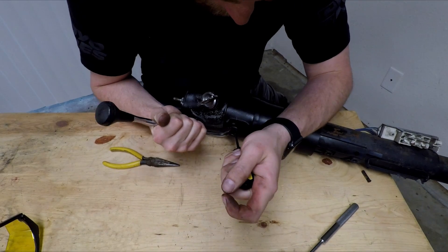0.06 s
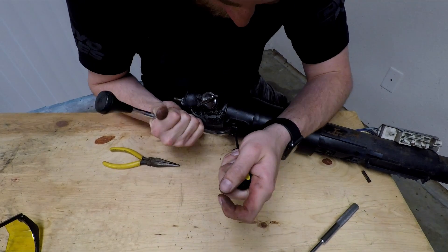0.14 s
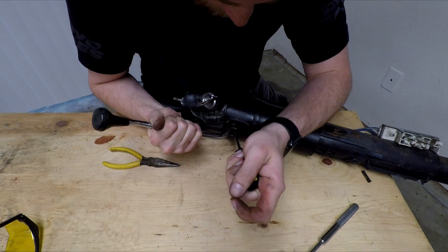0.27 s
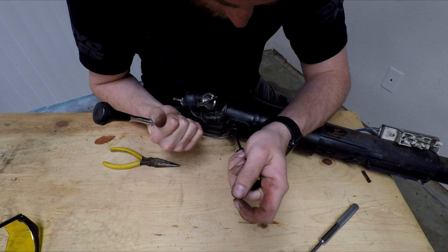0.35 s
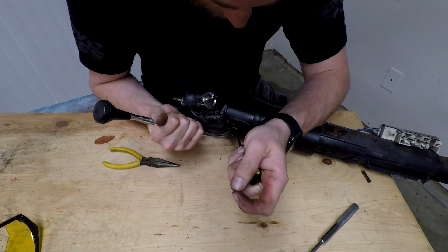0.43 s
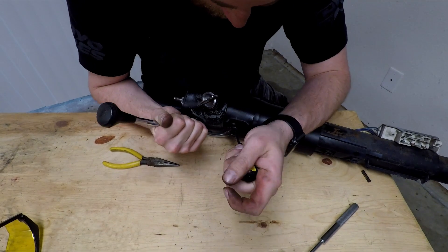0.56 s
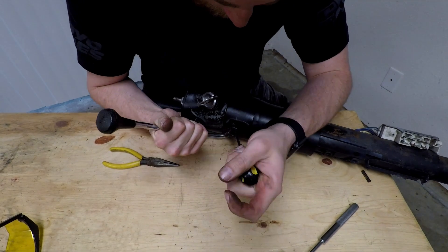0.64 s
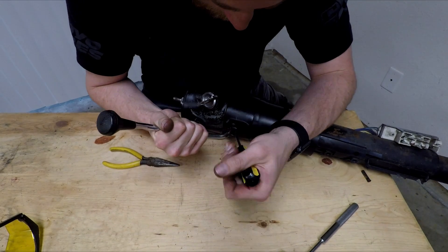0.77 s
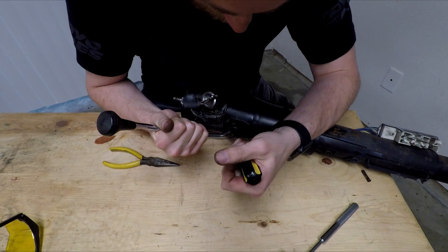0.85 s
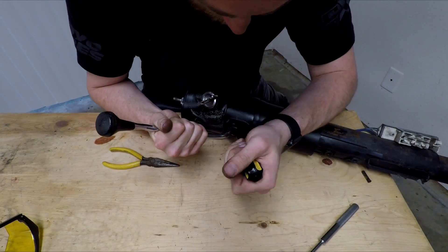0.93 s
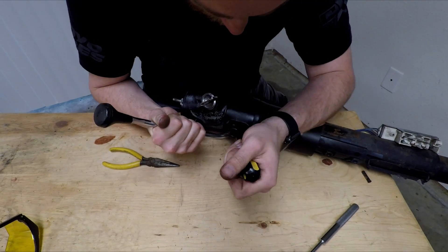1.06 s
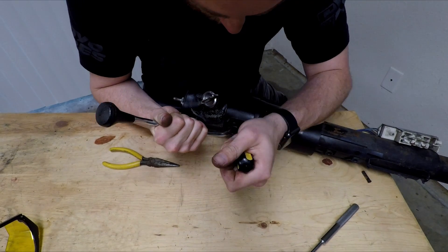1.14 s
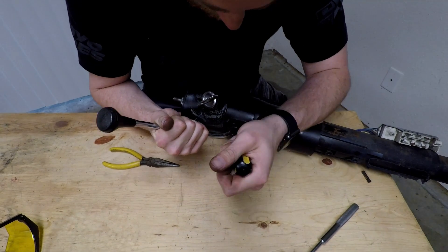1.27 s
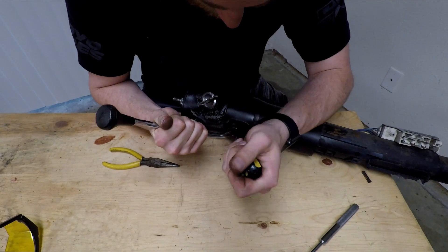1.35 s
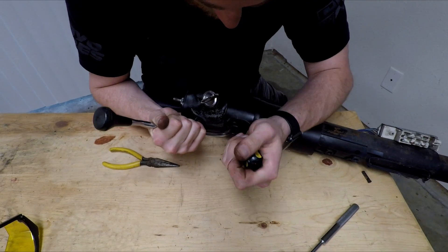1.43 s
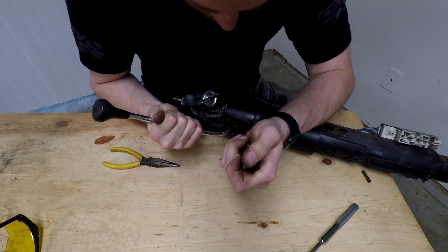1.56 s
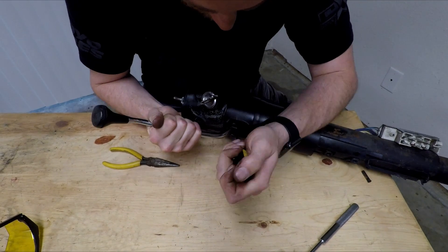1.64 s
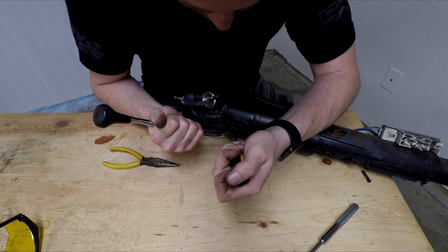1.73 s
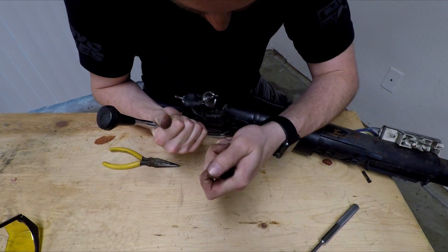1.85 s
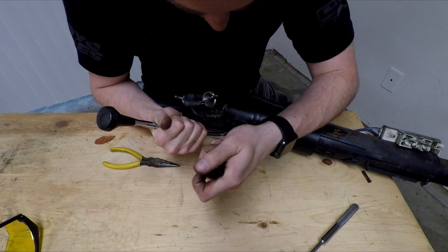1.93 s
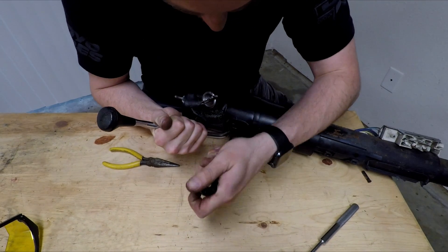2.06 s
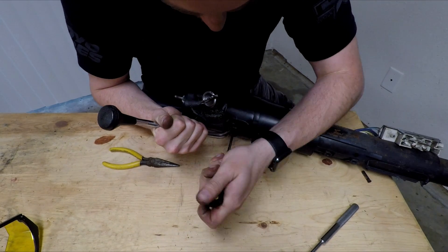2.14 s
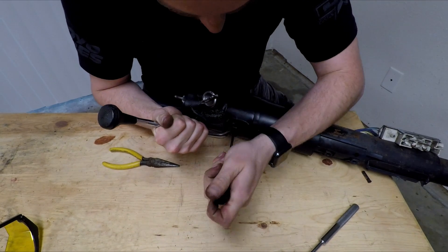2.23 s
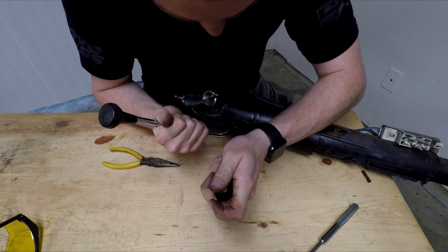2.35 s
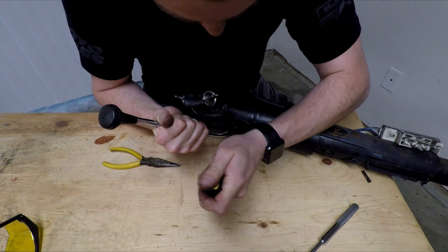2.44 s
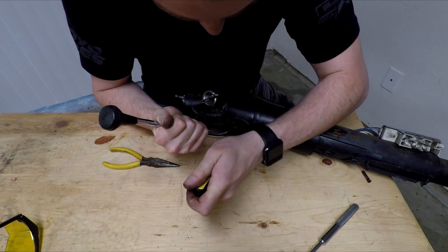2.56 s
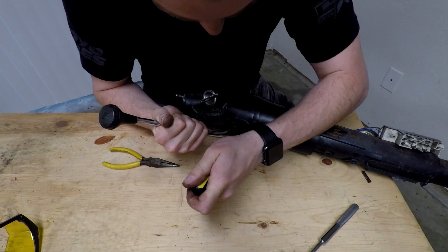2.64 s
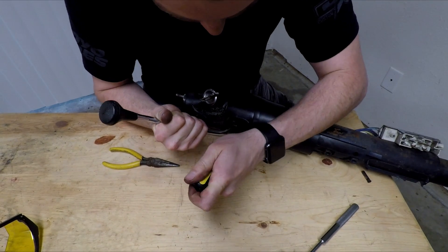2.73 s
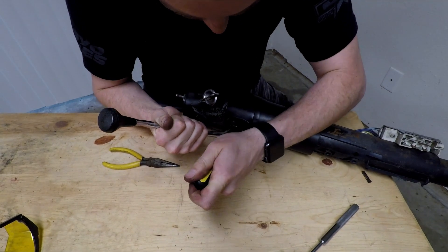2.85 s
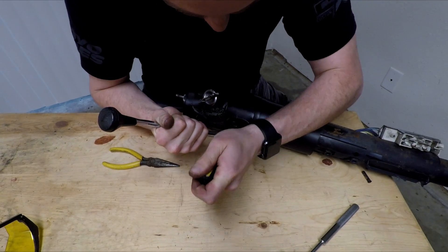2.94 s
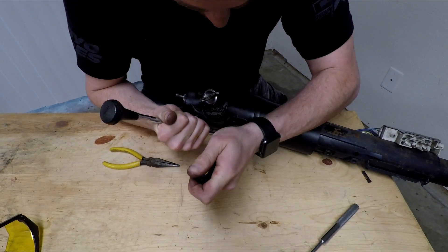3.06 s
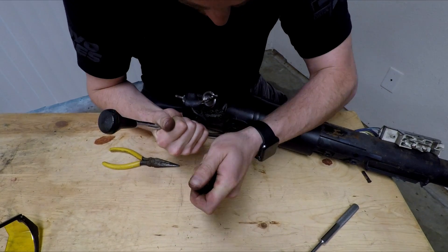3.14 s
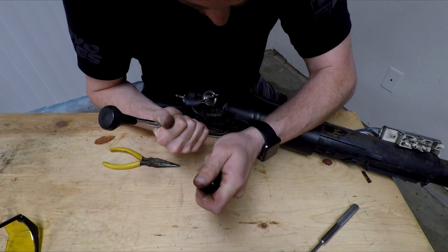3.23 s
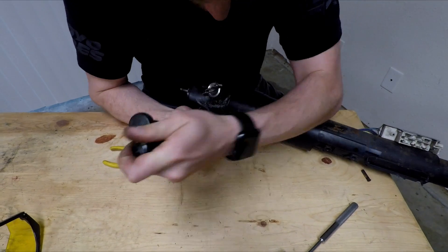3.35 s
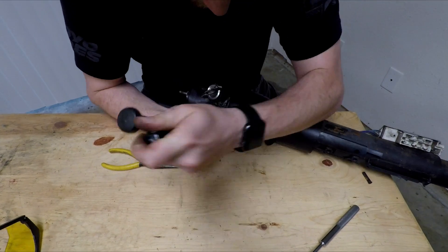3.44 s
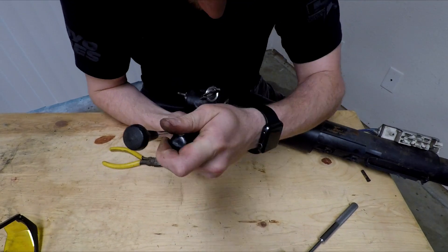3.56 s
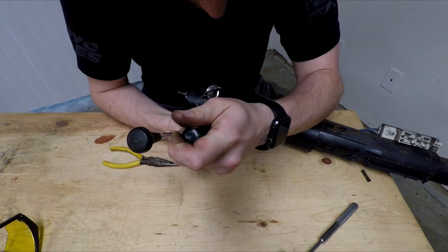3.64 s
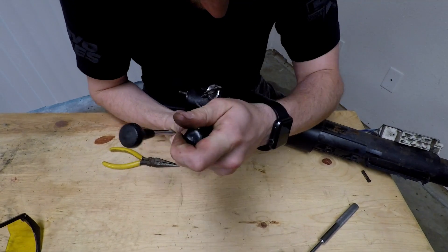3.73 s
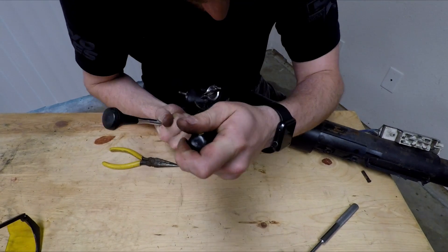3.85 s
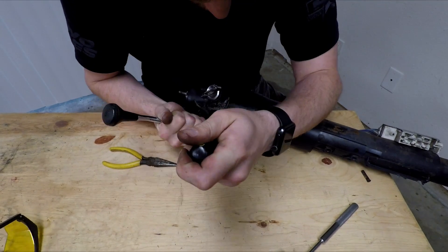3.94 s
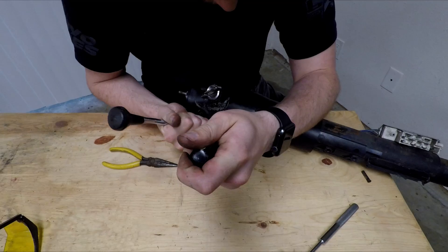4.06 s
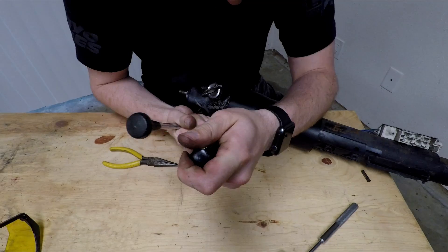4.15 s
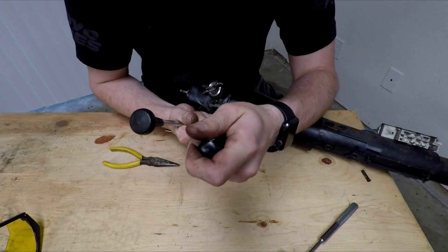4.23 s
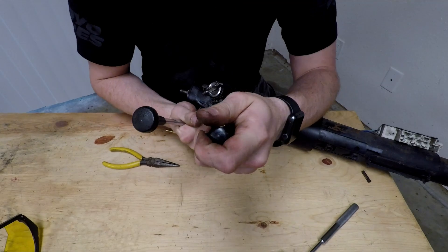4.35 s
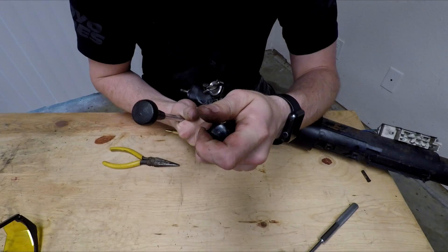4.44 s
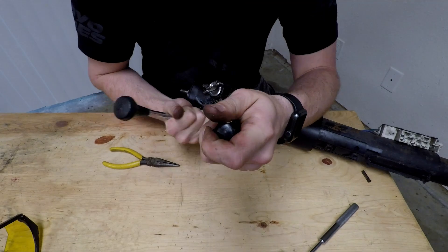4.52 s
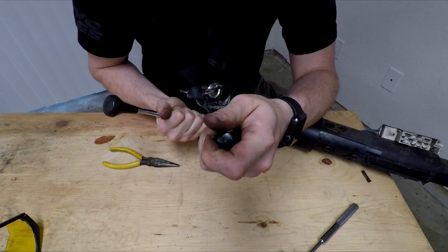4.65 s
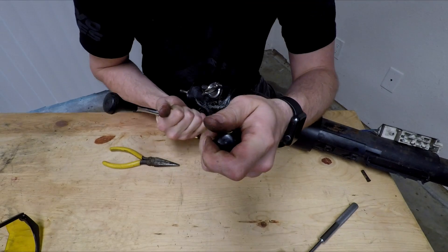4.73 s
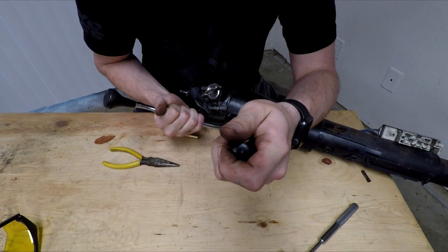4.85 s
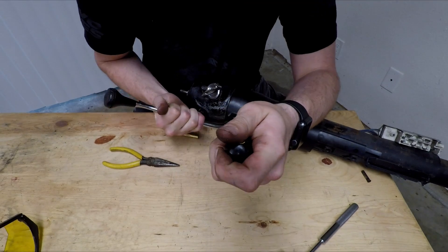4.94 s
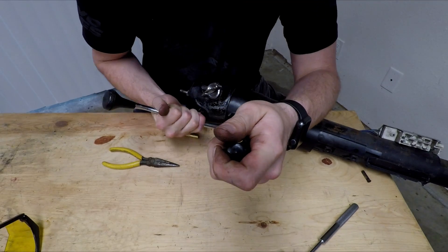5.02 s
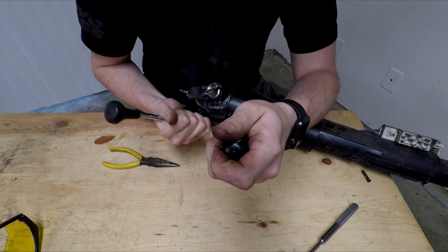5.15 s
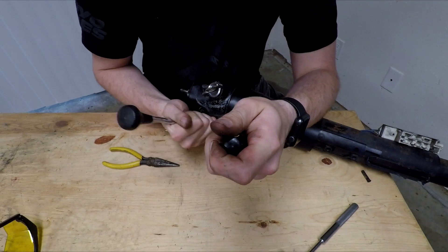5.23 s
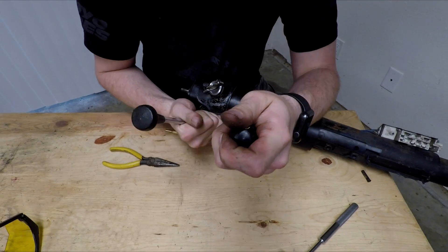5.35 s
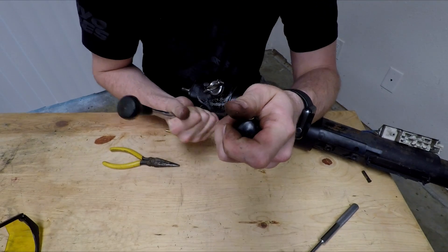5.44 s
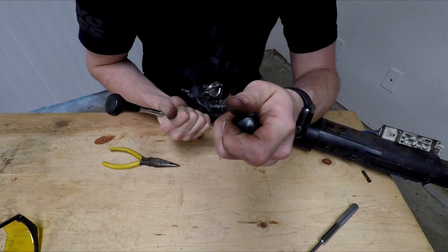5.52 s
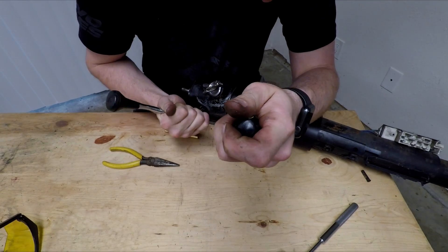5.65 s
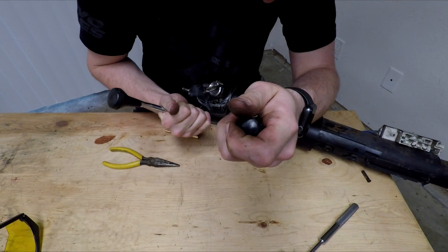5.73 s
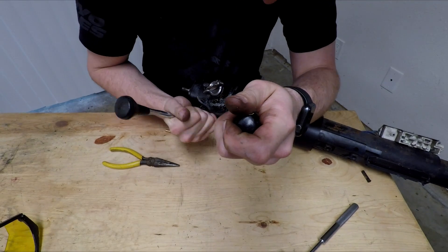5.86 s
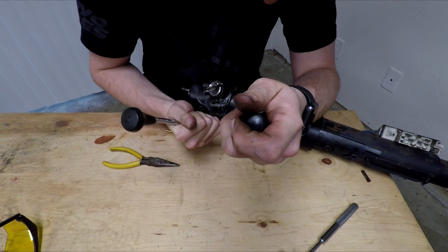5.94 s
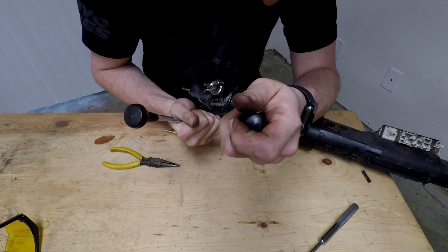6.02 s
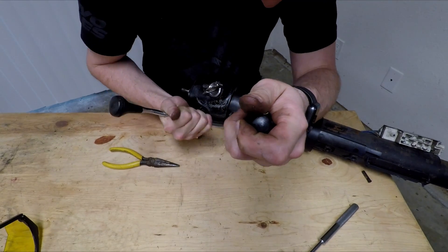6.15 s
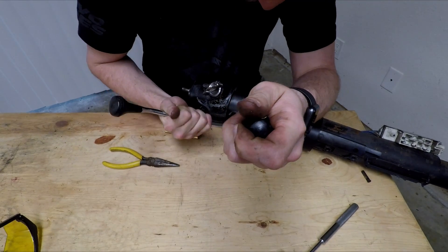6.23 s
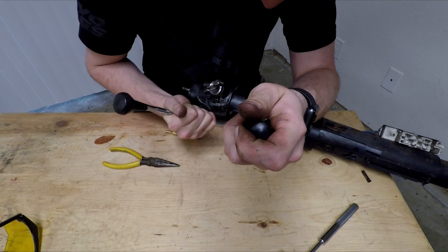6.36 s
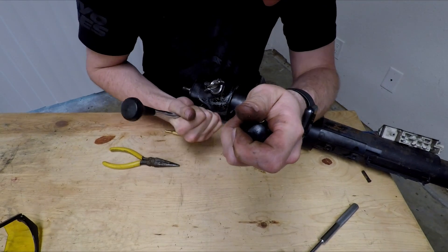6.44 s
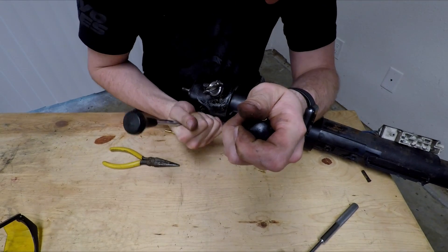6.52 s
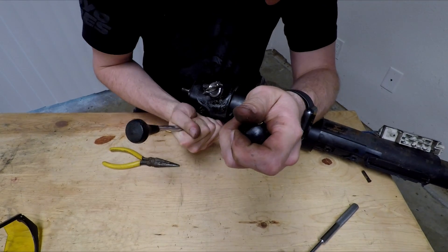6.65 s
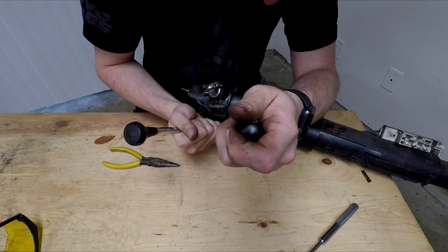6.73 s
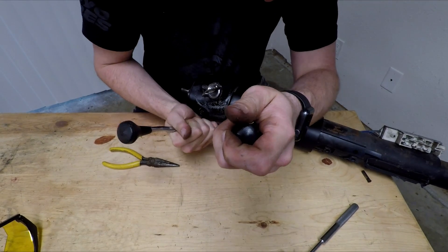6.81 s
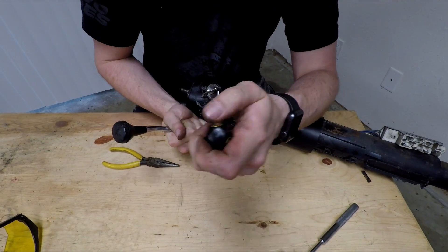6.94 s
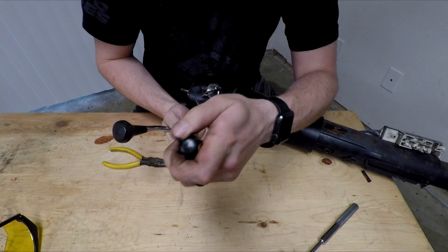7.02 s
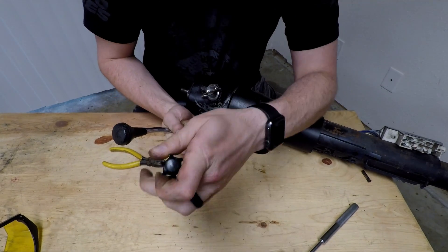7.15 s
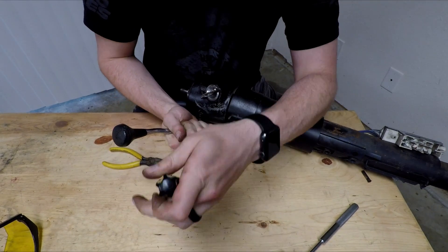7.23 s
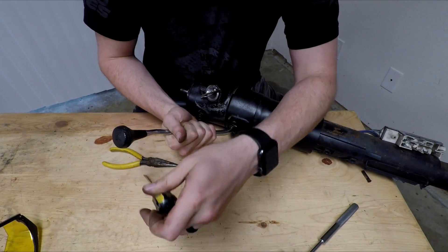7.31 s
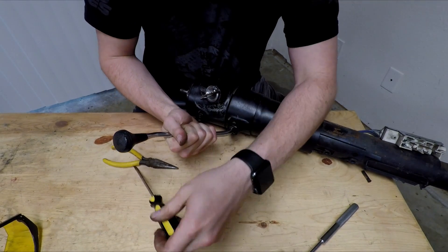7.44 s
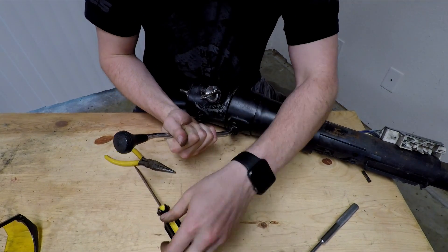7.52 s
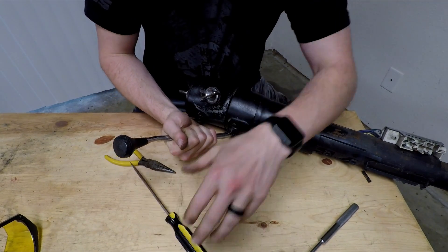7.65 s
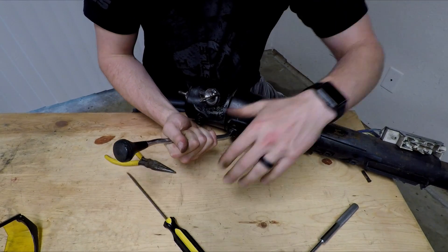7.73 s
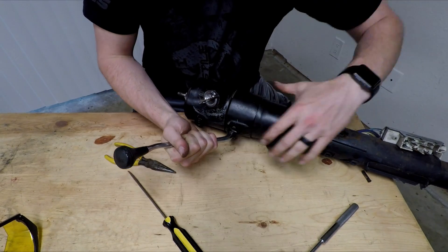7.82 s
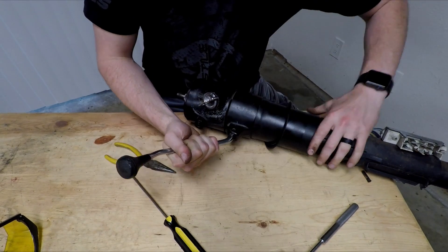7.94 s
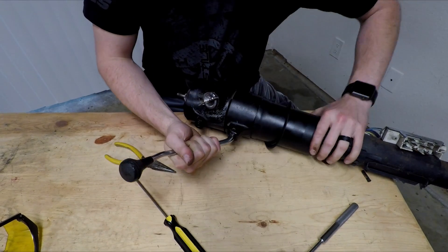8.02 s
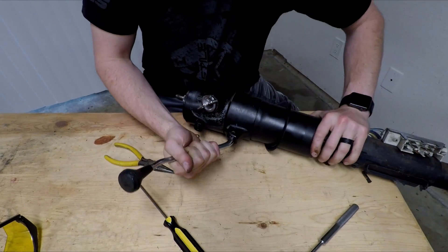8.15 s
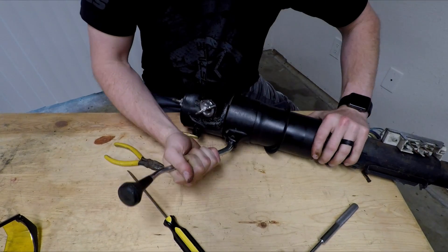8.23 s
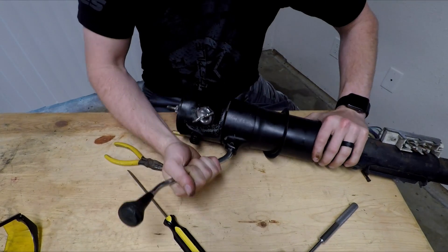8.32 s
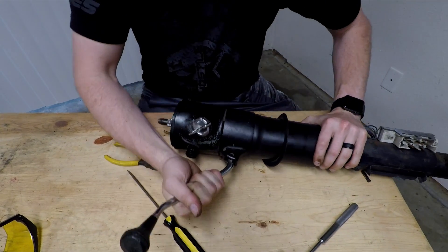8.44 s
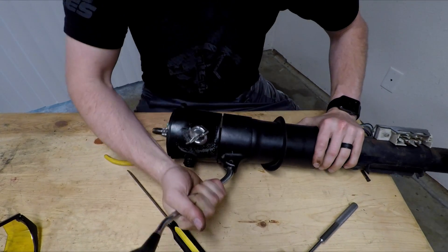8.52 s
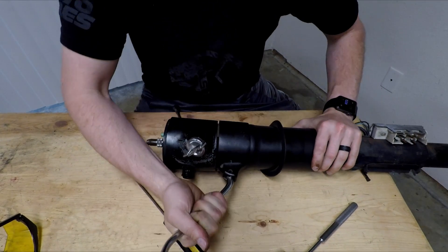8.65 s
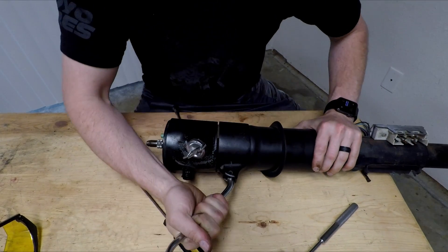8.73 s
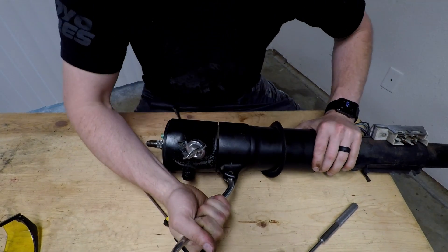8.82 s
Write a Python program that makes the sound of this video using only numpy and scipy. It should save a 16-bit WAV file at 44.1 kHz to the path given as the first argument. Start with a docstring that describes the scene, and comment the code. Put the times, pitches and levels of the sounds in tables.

```python
"""A wooden workbench in a garage: a small screwdriver pries at a spring and a metal lever on a strut. The tip
ticks and scrapes, the spring snaps twice, hard enough to overload the microphone, the screwdriver clatters onto
the bench, and the lever clanks as the strut is dragged round, while skin or cloth brushes past with a fine
hiss. Blows are short noise bursts through the colour of the object, with dying sines for what rings on; rubbing
is shaped noise. The room answers with dense reflections over a faint, steady air noise."""
import sys
import numpy as np
from scipy import signal
from scipy.fft import rfft, irfft
from scipy.io import wavfile

SR = 44100
rng = np.random.default_rng(int(sys.argv[2]) if len(sys.argv) > 2 else 0)


def dump(signal):
    """Clip the signal to [-1, 1] and save it as 16-bit WAV at the path in sys.argv[1]."""
    limited = np.clip(np.atleast_2d(signal).T, -1, 1)
    pcm = np.round(limited * 32767).astype(np.int16)
    wavfile.write(sys.argv[1], SR, pcm)


N = 391608  # samples
TAPS = 4096  # length of a burst, samples
HZ = np.fft.rfftfreq(TAPS, 1 / SR)  # frequency grid of all colours

# In all tables of blows, level_db and chatter_t60_s are relative: each source scales them.
# tool and lever knocking against the strut: start_s, level_db, bass_db, treble_db, ring_hz, chatter_t60_s
KNOCK_ROWS = [(0.0993, -45.5, 9, -10, 756, 0.085), (0.4983, -49, 4, -29, 440, .045),
              (0.9532, -34, 1, -21, 630, 0.02), (1.3248, -45, 11, 27.5, 1220, 0.061),
              (1.3876, -41.5, 20, -1, 1040, .08), (1.521, -36.5, -23, 6.5, 247, 0.027),
              (2.4093, -44, -15, -21, 318, 0.086), (2.8564, -45, 0, -49, 565, 0.071),
              (3.0053, -38.5, 20.5, 4, 343, 0.074), (3.8369, -41.5, -13, -3, 728, 0.038),
              (4.132, -38, -4, -25.5, 547, 0.095), (4.1571, -35.5, -11.5, -9, 640, 0.034),
              (4.2687, -35, 7.5, 3.5, 1226, 0.054), (4.5263, -36, -4.5, -13, 4470, 0.11),
              (4.5981, -45.5, 8, 5, 3800, 0.097), (5.1298, -34, -0.5, 5, 501, 0.04),
              (5.1593, -36.5, 6.5, 6.5, 487, 0.069), (5.2741, -24, -9, 1.5, 224, 0.0437),
              (5.3639, -37.5, 11, 8.5, 350, .09), (5.4366, -43, -15.5, -5.5, 247, .09),
              (5.594, -41.5, -1, -2, 3730, .037), (5.6146, -38, 19.5, 19.5, 1974, 0.057),
              (5.71, -45.5, -7.5, 9, 247.5, 0.053), (5.9403, -28, -15.5, -9, 220, 0.032),
              (6.091, -35, -8.5, -8, 353, 0.13), (6.1197, -23, -12, -13, 2900, .03)]
# dull thumps of the strut and the hand on the bench:
# start_s, level_db, bass_db, treble_db, ring_hz, chatter_t60_s
THUMP_ROWS = [(3.256, -23, 8, 10, 130, 0.11), (3.351, -25.5, 13, -12, 576, 0.094),
              (7.2828, -19.5, 4, 1.5, 580, .08), (7.339, -36.5, -7, 6, 299, .1),
              (7.3744, -34, 9, 10.5, 640, 0.11), (7.4313, -40, 12.5, -8, 404, .06),
              (8.0898, -42.5, -4, -14, 250, 0.12), (8.164, -44, -9, 0, 262, 0.094)]


def spring_snaps():
    """The spring lets go and strikes home: hard, bright contacts, then its modes ring on."""
    # the contacts: start_s, level_db, bass_db, treble_db, ring_hz, chatter_t60_s
    snap_rows = [(3.2057, -33, -12, -3, 3880, 0.044), (3.2141, -26, -5.5, 4.5, 4100, 0.079),
                 (3.2236, 0, 0.5, -2.5, 5500, 0.037), (3.2519, -7, 11, 1.5, 2200, .044),
                 (4.7907, -6.5, -17.5, -4.5, 1350, 0.036)]
    # colour of a snap: frequency_hz, gain_db
    snap_colour = [(25, -29), (60, -11), (200, -19), (700, -8.5), (1100, -10.5), (1500, -2.5), (2000, 1),
                   (2800, -6), (4200, 1.5), (5200, -8.5), (7800, -9.5), (9000, -12.5), (15000, -20.5)]
    # what rings on in the spring: frequency_hz, energy_db (relative), t60_s
    spring_modes = [(1185, -23.5, .25), (1505, -18, 0.22), (1914, -22, 0.21), (2648, -22, .25),
                    (4474, -24, .23), (5580, -24, .13), (7850, -23, 0.091)]
    contacts = blows(snap_rows, snap_colour, length=0.87, rise_s=0.00037,
                     peak_db=6.0, ripple_db=1.4, rebound_db=-16.5)
    return amp(3.0) * contacts + rings(snap_rows, spring_modes)


def tip_ticks(ring_db=20, length=0.86):
    """Each slip of the tip rings one short resonance that depends on where the spring is held."""
    # the tip slipping on the spring, level and chatter relative:
    # start_s, level_db, ring_hz, treble_db, chatter_t60_s, slip_s
    tick_rows = [(0.242, -33.5, 2080, 10, .02, .005), (0.532, -40.5, 1670, 11, .04, .005),
                 (1.1141, -47, 1610, -1, 0.035, .005), (2.0417, -49, 1700, -2, 0.029, .005),
                 (3.8007, -38, 2140, 8, 0.017, .005), (4.2642, -34, 2060, -6, .025, .005),
                 (4.37, -44, 1958, 7, .02, .047), (4.617, -45.5, 1653, 0.5, 0.1, .005),
                 (4.749, -37.5, 1680, 8.5, .16, .005), (5.8119, -38, 1935, 3, 0.08, .02),
                 (6.0612, -30.5, 1973, -14, .07, .02), (6.335, -43.5, 1979, -6, 0.029, .005),
                 (6.5642, -43, 2765, -16, 0.035, .005)]
    # colour of a tick: frequency_hz, gain_db
    tick_colour = [(25, -26), (200, -8), (700, -3), (1300, -3.5), (2700, -6), (3600, -5.5), (4600, -20.5),
                   (6000, -23.5), (9000, -42.5), (15000, -49.5)]
    width_hz, rise_s = 190, .0014
    # in a long slip the tip catches again and again, each time more weakly
    catch_gap_s, catch_loss_db = 0.016, -2.5
    out = np.zeros(N)
    for s, db, hz, treble_db, t60, slip_s in tick_rows:
        gain_db = read(tick_colour, HZ) + resonance(hz, width_hz, ring_db) + shelves(0, treble_db)
        for k, lag_s in enumerate(np.arange(0, slip_s, catch_gap_s)):
            catch = coloured(chatter(t60 * length, rise_s), gain_db + contact_point(4))
            add(out, s + lag_s - rise_s / 2, at_level(catch, db + k * catch_loss_db))
    return amp(0.5) * out


def strut_knocks():
    """Tool and lever knock on the strut: the click comes first, the thud follows, a hollow note rings."""
    # colour of a knock: frequency_hz, gain_db
    knock_colour = [(25, -22.5), (50, 1), (100, -2), (200, -1), (400, -3.5), (700, -6.5), (1200, -13),
                    (2000, -9), (3000, -19), (4400, -25.5), (6000, -32.5), (9000, -41.5), (15000, -53.5)]
    # the hollow note of the strut: frequency_hz, energy_db (relative), t60_s
    strut_modes = [(187, -15.5, .14), (315, -14, .16)]
    contacts = blows(KNOCK_ROWS + touches(), knock_colour, length=0.63, rise_s=0.00088,
                     peak_db=10.0, ripple_db=3.0, rebound_db=-5)
    return amp(-1.4) * through_bench(contacts) + rings(KNOCK_ROWS, strut_modes)


def touches(per_s=6, bass_db=-5.5, treble_db=-2, low_hz=700, high_hz=2440, t60_s=.045):
    """Faint knocks at chance moments while the tool seeks its grip, as rows of blows."""
    # the tool fumbling for a grip: start_s, end_s, level_db (relative)
    fumbles = [(0, 1.77, -56), (2.401, 3, -55.5), (3.952, 5.8, -46.5), (6.299, 7.15, -54.5)]
    rows = []
    for start, end, db in fumbles:
        count = max(round((end - start) * per_s), 1)
        for k in range(count):
            s = start + (end - start) * (k + rng.random()) / count
            ring_hz = rng.uniform(low_hz, high_hz)
            rows.append((s, db, bass_db, treble_db, ring_hz, t60_s))
    return rows


def through_bench(x, lag_s=0.0072, corner_hz=230):
    """Low bending waves travel slowly, so the thud of a knock follows its click."""
    hz = np.fft.rfftfreq(2 * N, 1 / SR)
    phase = -2 * np.pi * lag_s * corner_hz * np.arctan(hz / corner_hz)
    return irfft(rfft(x, 2 * N) * np.exp(1j * phase))[:N]


def bench_clatter():
    """The dropped screwdriver and the strut clatter on the bench top, whose wood rings on."""
    # the bumps: start_s, level_db, bass_db, treble_db, ring_hz, chatter_t60_s
    bump_rows = [(7.609, -5, 20.5, 2, 1310, 0.039), (7.6224, -8, -50.5, -7.5, 2740, 0.039),
                 (7.6306, -13, 6, -7, 322, 0.091), (7.663, -18, 11, -7, 1340, 0.1),
                 (7.714, -17.5, -8, -27, 700, 0.129), (7.7239, -19.5, -7, -3, 1790, 0.055),
                 (7.7811, -14.5, -4, 0, 2750, 0.038), (7.8047, -20.5, 2, -4, 1120, 0.062),
                 (7.8301, -16.5, 0, -13, 422, 0.034), (7.875, -27.5, -2, -28, 1300, .05),
                 (7.892, -28, -9, -16, 860, 0.049), (7.9134, -28.5, 22, 23, 2470, 0.092)]
    # colour of a bump: frequency_hz, gain_db
    bump_colour = [(25, -40), (50, -22), (90, -13), (170, -4.5), (310, -3), (450, -0.5), (680, 5),
                   (1100, -0.5), (1600, 0.5), (2400, -9), (3800, -13.5), (5500, -32), (9000, -44),
                   (15000, -71)]
    # what the bench top rings with: frequency_hz, energy_db (relative), t60_s
    bench_modes = [(316.5, -17.5, 0.36), (675, -9.5, 0.1), (1341, -23, 0.26), (1840, -24, 0.11)]
    contacts = blows(bump_rows, bump_colour, length=0.715, rise_s=0.00083,
                     peak_db=7.0, ripple_db=2.46, rebound_db=-6.5)
    return amp(-0.16) * contacts + amp(1.5) * rings(bump_rows, bench_modes)


def lever_clanks():
    """The lever swings against its stops: strongly resonant contacts, then its modes ring on."""
    # the clanks: start_s, level_db, bass_db, treble_db, ring_hz, chatter_t60_s
    clank_rows = [(8.3169, -20.5, 9, 4, 1680, 0.013), (8.3521, -22.5, 12, -35, 1090, 0.027),
                  (8.3735, -23, 13, 16.5, 1010, 0.043), (8.5097, -14, 15.5, 14, 2500, 0.043),
                  (8.5334, -15, 4, -26, 1082, 0.09), (8.7099, -39.5, -9, -6, 1650, 0.042),
                  (8.7767, -38, 11, -3.5, 3070, .046)]
    # colour of a clank: frequency_hz, gain_db
    clank_colour = [(25, -15), (60, -13.5), (200, -2.5), (500, 1.5), (1050, -3.5), (1700, 3), (2600, -10),
                    (3300, -9), (4100, -6), (5500, -24), (8000, -22.5), (15000, -39)]
    # what the lever rings with: frequency_hz, energy_db (relative), t60_s
    lever_modes = [(933, -22, 0.26), (1105, -12, 0.23), (1632, -7.5, 0.068), (2735, -9, 0.07),
                   (4005, -12, 0.11), (5160, -24.5, 0.11), (6240, -26, 0.057), (6170, -28, .11),
                   (7800, -41, .07)]
    contacts = blows(clank_rows, clank_colour, length=0.725, rise_s=0.00097,
                     peak_db=14.0, ripple_db=7.5, rebound_db=-9.0)
    return amp(0.5) * contacts + amp(-3.5) * rings(clank_rows, lever_modes)


def bench_thumps():
    """Dull thumps of the strut and the hand on the bench: mostly bass and short."""
    # colour of a thump: frequency_hz, gain_db
    thump_colour = [(25, -23), (50, -8), (90, -7), (170, -3), (310, -6.5), (600, -13), (1100, -25.5),
                    (2000, -26.5), (4000, -37.5), (8000, -47.5), (15000, -63)]
    return amp(1.0) * blows(THUMP_ROWS, thump_colour, length=0.36, rise_s=0.0017,
                            peak_db=9.5, ripple_db=6.5, rebound_db=-10.5)


def slide(grains_per_s=900, spread_db=1.0, smooth=0.12, spots=4):
    """Tiny catches of rough surfaces over a fine hiss; the colour shifts as the point of contact wanders."""
    # steel sliding on steel and the strut on the bench, one row per stroke:
    # start_s, length_s, level_db (relative)
    rub_rows = [(0, 0.27, -59.5), (.88, 0.11, -51.5), (1.47, 0.44, -55), (1.98, .12, -59),
                (2.45, 0.17, -60), (2.87, 0.25, -55), (4.1, 0.79, -57), (5.55, 0.37, -57.5),
                (6.04, 0.14, -45), (6.52, 0.37, -61.5), (7.5, 0.18, -52), (8.08, 0.4, -41.5),
                (8.36, 0.41, -36)]
    # colour of the rubbing: frequency_hz, gain_db
    slide_colour = [(60, -29), (150, -7), (300, -6), (500, -8), (1000, -17), (1700, -14), (2600, -18),
                    (4100, -22), (5300, -34), (7000, -31), (10000, -40.5), (15000, -42)]
    rest_db = -69  # on the same scale: the parts never lie quite still
    force = amp(spread_db * np.minimum(rng.exponential(1, N), 4))
    catches = (rng.random(N) < grains_per_s / SR) * force
    rub = np.zeros(N)
    for _ in range(spots):
        share = np.interp(np.arange(N), np.linspace(0, N, 130), rng.random(130) ** 3)
        grain = share * (catches + smooth) * rng.standard_normal(N)
        rub += coloured(grain, read(slide_colour, HZ) + contact_point(3))[:N]
    level = amp(rest_db) + strokes(rub_rows, peak_at=0.43, fullness=1.1)
    return amp(-4.5) * unit(rub) * np.sqrt(N) * level


def brush(low_hz=5500, high_hz=13000):
    """Skin or cloth brushing over the parts gives a fine, high hiss."""
    # skin or cloth brushing past, one row per stroke: start_s, length_s, level_db (relative)
    brush_rows = [(7.9, .07, -52.5), (7.98, 0.056, -55), (8.15, 0.26, -53), (8.5, .2, -58)]
    band = signal.butter(2, [low_hz, high_hz], "bandpass", fs=SR, output="sos")
    hiss = signal.sosfilt(band, rng.standard_normal(N))
    return amp(-7) * unit(hiss) * np.sqrt(N) * strokes(brush_rows, peak_at=0.48, fullness=1.1)


def bench_sway(low_hz=35, top_hz=130, rest_db=-68):
    """The heavy bench gives a soft, deep rumble after each knock or thump and around some other blows."""
    # further deep rumbles of the bench around ticks, knocks, snaps and clanks: start_s, length_s, level_db
    rumbles = [(0.248, 0.14, -47), (3.002, 0.12, -41), (3.238, 0.12, -23), (4.583, 0.11, -48),
               (4.79, .1, -39), (6.567, 0.11, -47.5), (8.301, .09, -28)]
    sway_db, sway_s = -17, 0.12  # level against the blow's level_db, length
    rocking = [(s, sway_s, db + sway_db) for s, db, *_ in KNOCK_ROWS + THUMP_ROWS]
    push = amp(rest_db) + strokes(rocking + rumbles, peak_at=0.18, fullness=1.5)
    band = signal.butter(3, [low_hz, top_hz], "bandpass", fs=SR, output="sos")
    deep_noise = signal.sosfilt(band, rng.standard_normal(N))
    return push * unit(deep_noise) * np.sqrt(N)


def garage(x, build_s=0.002, bass_build_s=0.0074, early_db=5, early_s=0.048):
    """Dense reflections, strong from the near walls; bass swells later, each band dies at its own speed."""
    # reverberation time: frequency_hz, t60_s
    room_t60 = [(80, 2.1), (300, 0.76), (1000, 0.74), (2000, 0.75), (4200, 0.64), (6000, 0.62),
                (9000, 0.46), (15000, 0.4)]
    # strength of the reverberation: frequency_hz, gain_db
    room_colour = [(40, -3), (150, -10.5), (400, -5.5), (1000, -4), (2000, -7.5), (4500, -0.5),
                   (8000, -4.5), (15000, -11)]
    # standing waves: frequency_hz, energy_db, t60_s
    room_modes = [(90, -20, .55), (157, -29.5, 0.54), (196.4, -29, 0.28), (302.6, -30.5, .5),
                  (337, -28.5, 0.41)]
    hz, t, z = signal.stft(rng.standard_normal(SR), SR, nperseg=256)
    build = build_s + bass_build_s / (1 + (hz[:, None] / 500) ** 2)
    z = z * (1 - np.exp(-(t / build) ** 2)) * (1 + amp(early_db) * np.exp(-t / early_s))
    z = z * amp(-60 * t / read(room_t60, hz)[:, None])
    z = z / np.linalg.norm(z, axis=1, keepdims=True)
    flat = signal.istft(z, SR, nperseg=256)[1]
    tail = signal.istft(z * amp(read(room_colour, hz))[:, None], SR, nperseg=256)[1]
    tail = tail / np.linalg.norm(flat)
    add(tail, 0, ringing(room_modes))
    return signal.fftconvolve(x, tail)[:N]


def air(level_db=-56.5):
    """Steady faint noise of the room and the microphone."""
    # spectrum of the still room: frequency_hz, gain_db (relative)
    air_colour = [(12, -29), (20, 15), (34, -4.5), (202, -26), (315, -14), (519, -24), (725, -18),
                  (834, -32), (1200, -28.5), (1540, -33.5), (2210, -32.5), (4070, -31.5), (5230, -36.5),
                  (12400, -39.5), (15500, -48.5)]
    gain = amp(read(air_colour, np.fft.rfftfreq(N, 1 / SR)))
    noise = irfft(rfft(rng.standard_normal(N)) * gain, N)
    return amp(level_db) * unit(noise) * np.sqrt(N)


def blows(rows, colour, length, rise_s, peak_db, ripple_db, rebound_db):
    """Chattering contacts coloured by the object and the spot that is hit; each rebounds once."""
    out = np.zeros(N)
    for s, db, bass_db, treble_db, hz, t60 in rows:
        ring = resonance(hz, 60 + hz / 8, peak_db)
        gain_db = read(colour, HZ) + shelves(bass_db, treble_db) + ring
        rebound_s = rng.uniform(.003, .011)
        for lag_s, loss_db in [(0, 0), (rebound_s, rebound_db)]:
            contact = coloured(chatter(t60 * length, rise_s), gain_db + contact_point(ripple_db))
            add(out, s + lag_s, at_level(contact, db + loss_db))
    return out


def rings(rows, modes):
    """The modes ring on after each blow in a different mix; a dull blow hardly wakes the upper ones."""
    out = np.zeros(N)
    hz, level_db, t60 = np.transpose(modes)
    for s, db, _, treble_db, *_ in rows:
        detune, mix = rng.standard_normal((2, len(hz)))
        dull_db = np.interp(hz, HZ, shelves(0, min(treble_db, 0)))
        struck = zip(hz * (1 + .007 * detune), level_db + dull_db + 2 * mix, t60)
        add(out, s, amp(db) * np.sqrt(SR / 100) * ringing(struck))
    return out


def ringing(modes):
    """Half a second of dying sines, each with its given energy."""
    t = np.arange(SR // 2) / SR
    out = np.zeros(len(t))
    for hz, db, t60 in modes:
        out += amp(db) * unit(amp(-60 * t / t60) * np.sin(2 * np.pi * hz * t))
    return out


def chatter(t60, rise_s, count=5):
    """Two hard faces biting and rattling to rest: a short burst that holds all frequencies evenly."""
    t = np.arange(TAPS) / SR
    fade = amp(-60 * t / max(t60, .004)) * (1 - np.exp(-(t / rise_s) ** 2))
    fade = fade / fade.max()
    burst = rng.standard_normal(TAPS) * fade
    for _ in range(count):  # flatten the spectrum, then hold the burst under its fade again
        flat = irfft(np.exp(1j * np.angle(rfft(burst))))
        burst = flat * np.minimum(2 * fade, 1)
    return unit(burst)


def strokes(rows, peak_at, fullness):
    """Level of movements: each swells to its peak at a share of its length, then dies away."""
    out = np.zeros(N)
    for s, length, db in rows:
        along = np.linspace(0, 1, max(int(length * SR), 3))
        arch = np.interp(along, [0, peak_at, 1], [0, 1, 0])
        add(out, s, amp(db) * np.sin(np.pi / 2 * arch) ** fullness)
    return out


def shelves(bass_db, treble_db):
    """A heavy blow adds bass, a hard contact adds treble: dB on the grid HZ."""
    return bass_db / (1 + (HZ / 450) ** 2) + treble_db * HZ ** 3 / (HZ ** 3 + 3500 ** 3)


def resonance(hz, width_hz, db):
    """One damped resonance, as dB on the grid HZ."""
    return 10 * np.log10(1 + amp(db) ** 2 / (1 + ((HZ - hz) / width_hz) ** 2) ** 2)


def contact_point(ripple_db, size=46):
    """Each point of contact favours other resonances: a random ripple in dB over frequency."""
    ripple = np.c_[np.geomspace(250, 15000, size), rng.standard_normal(size)]
    return ripple_db * read(ripple, HZ)


def coloured(x, db):
    """Causal (minimum-phase) filter with the gain db on the grid HZ."""
    log_gain = np.log(amp(np.r_[db, db[-2:0:-1]]))
    response = np.fft.ifft(np.exp(np.conj(signal.hilbert(log_gain)))).real
    return signal.fftconvolve(x, response)


def at_level(x, db):
    """Gives a blow the energy of 10 ms at this level."""
    return amp(db) * np.sqrt(SR / 100) * unit(x)


def amp(db):
    """Decibels to amplitude."""
    return 10 ** (np.asarray(db) / 20)


def unit(x):
    """Scales to an energy of one."""
    return x / np.sqrt(np.sum(x ** 2) + 1e-20)


def read(points, hz):
    """Reads a table on a log-frequency axis."""
    f, value = np.transpose(points)
    return np.interp(np.log(hz + 1), np.log(f + 1), value)


def add(mix, s, sound):
    """Mixes a sound in at time s."""
    part = mix[max(round(s * SR), 0):][:len(sound)]
    part += sound[:len(part)]


def scene():
    """Blows and rubbing reach the microphone directly and by way of the room; sway and air are added dry."""
    spring, tip, knocks = spring_snaps(), tip_ticks(), strut_knocks()
    bench, lever, thumps = bench_clatter(), lever_clanks(), bench_thumps()
    rub = slide() + brush()
    direct = spring + tip + knocks + bench + lever + thumps + rub
    # each source excites the room to its own degree
    to_room = amp(-7.5) * spring + amp(-3.0) * tip + amp(-1.5) * knocks + rub
    to_room += amp(-0.5) * bench + amp(-3.5) * lever + amp(1.0) * thumps
    return (direct + garage(to_room) + bench_sway() + air())[None]


def record(dry, edge_hz=15650):
    """The loudest blows overload the microphone input and clip; then the band limit."""
    low_pass = signal.firwin(301, edge_hz, window=("kaiser", 8), fs=SR)
    return signal.oaconvolve(np.clip(dry, -1, 1), low_pass[None], "same")


dry = scene()
out = record(dry)
dump(out)
```